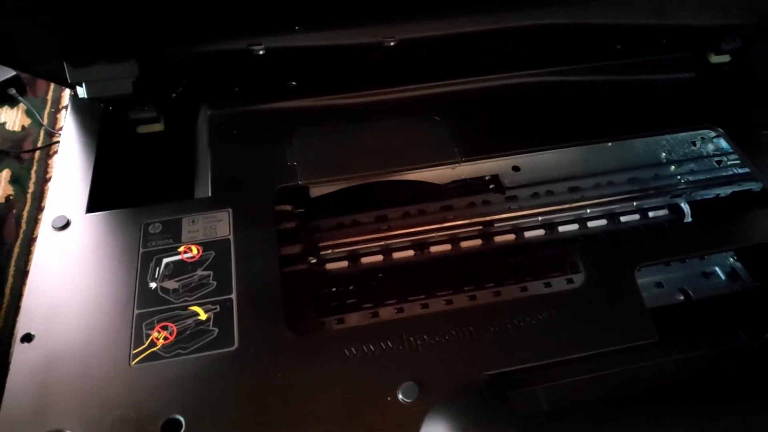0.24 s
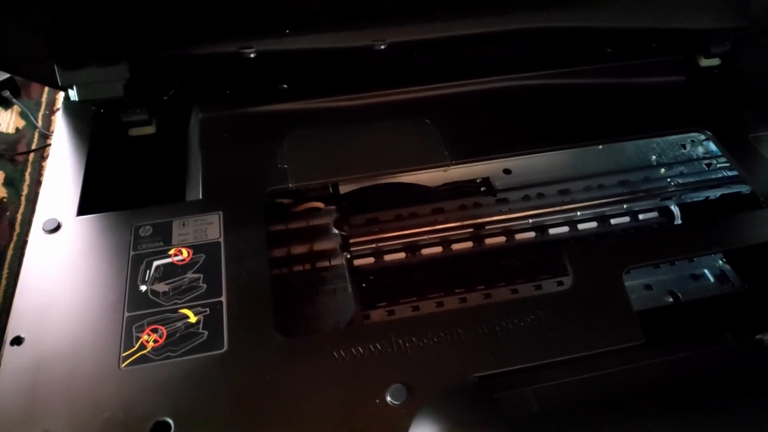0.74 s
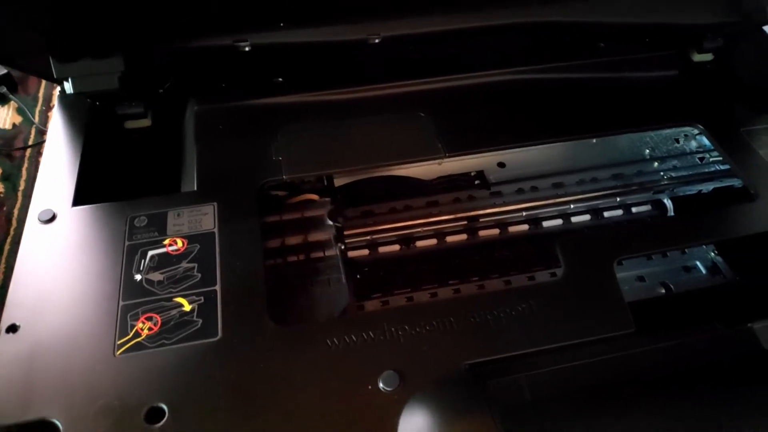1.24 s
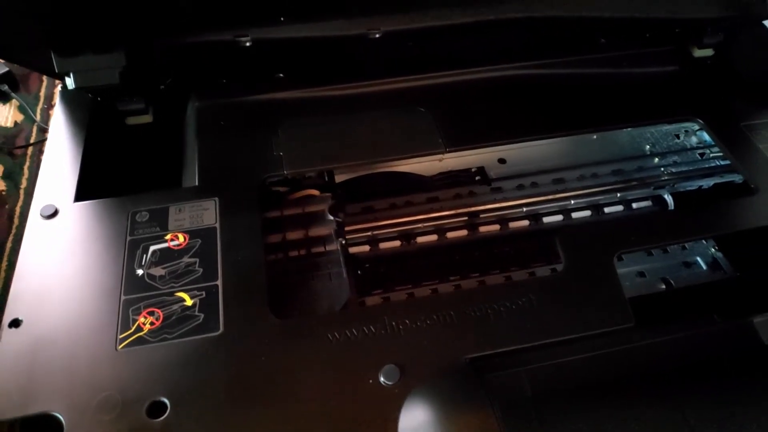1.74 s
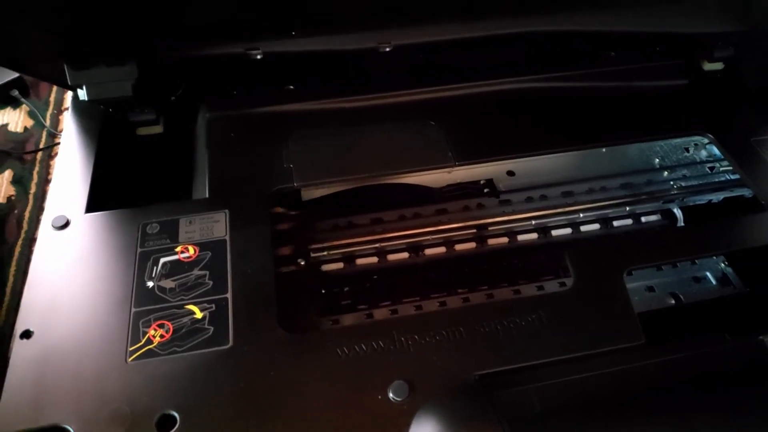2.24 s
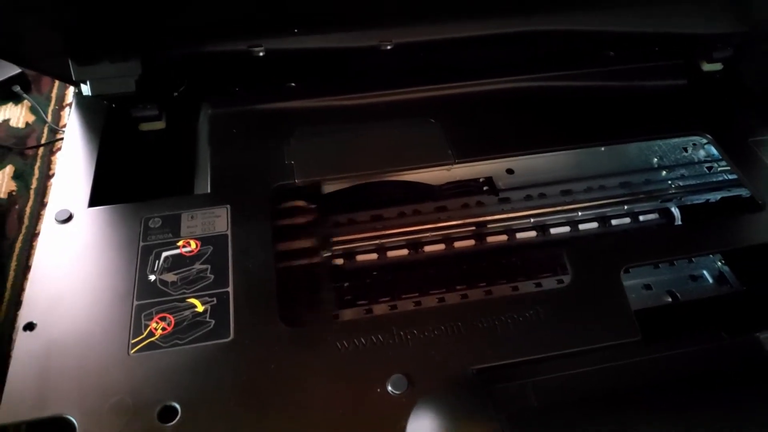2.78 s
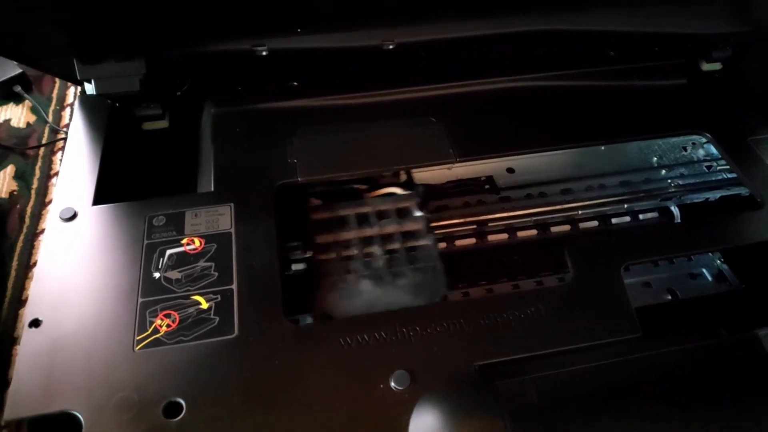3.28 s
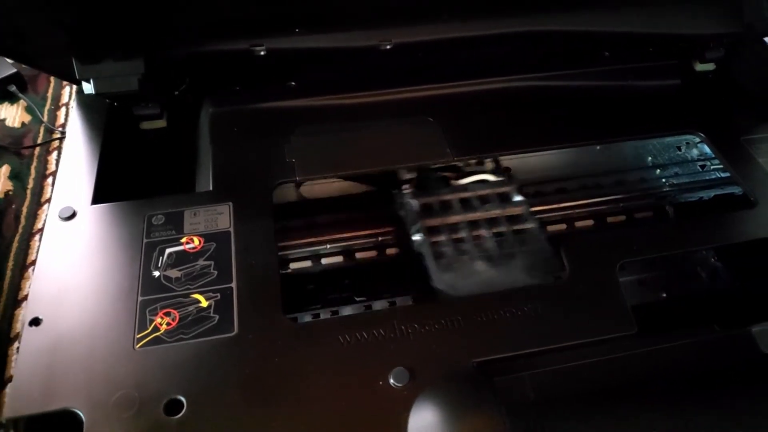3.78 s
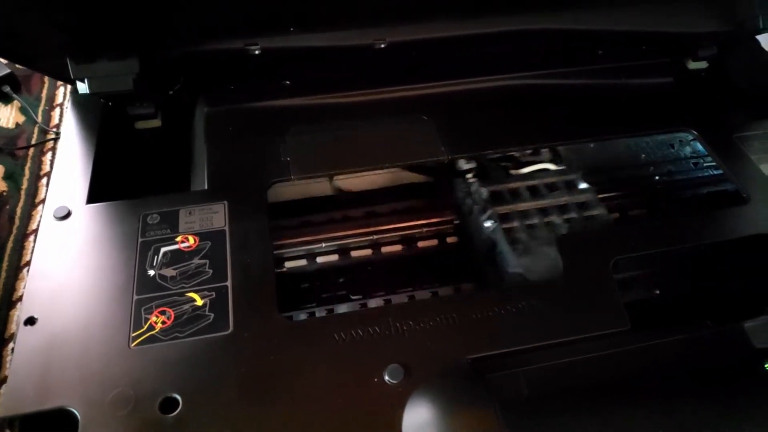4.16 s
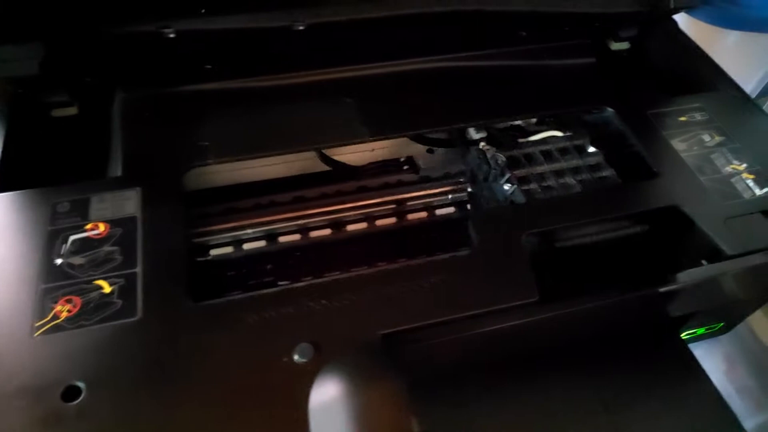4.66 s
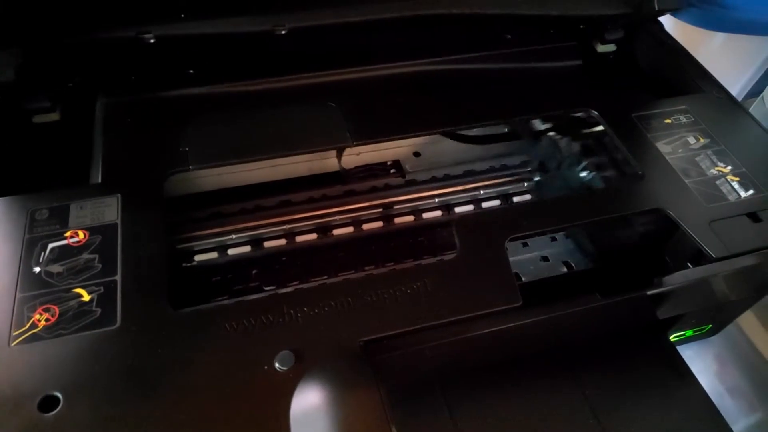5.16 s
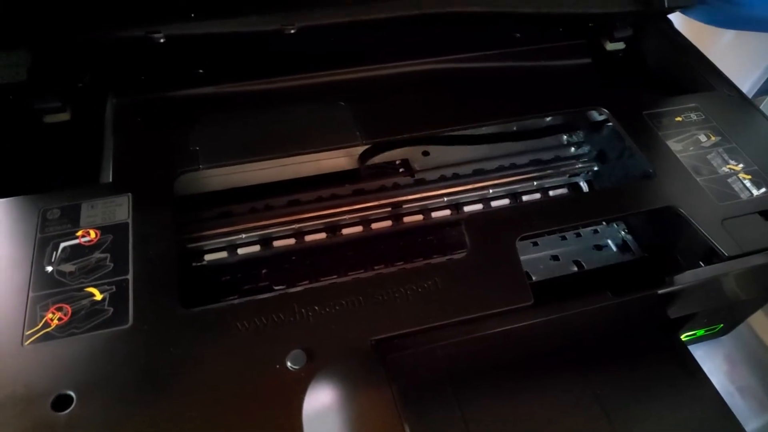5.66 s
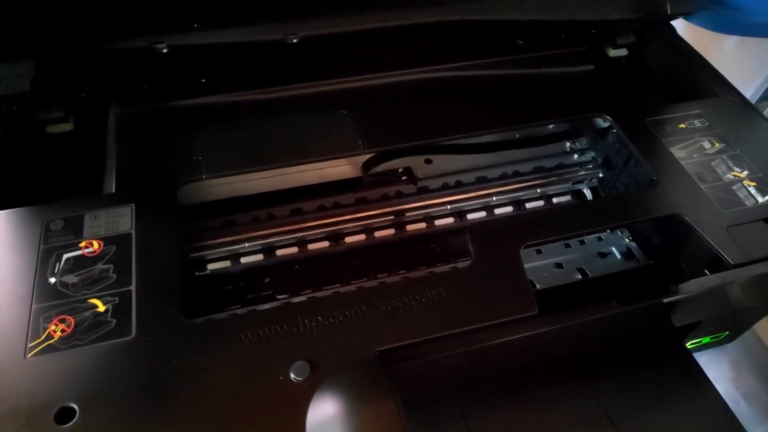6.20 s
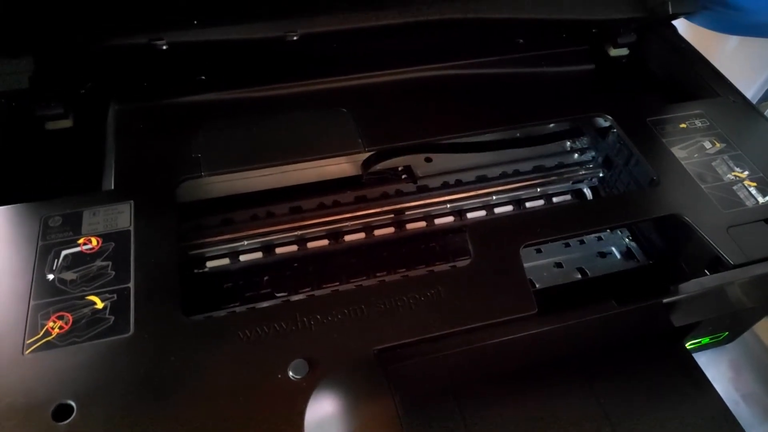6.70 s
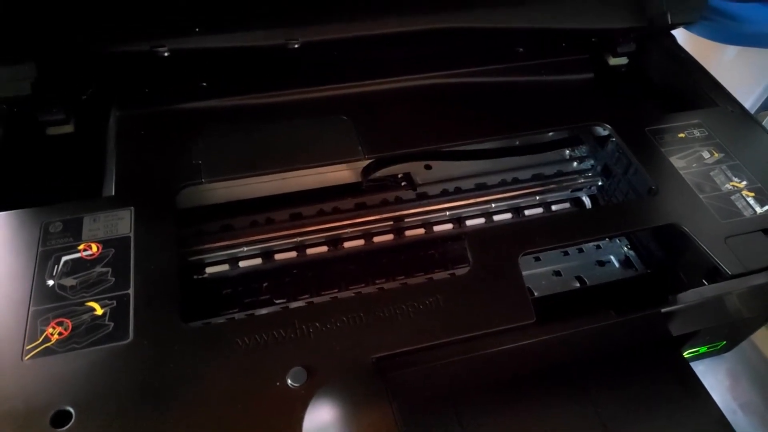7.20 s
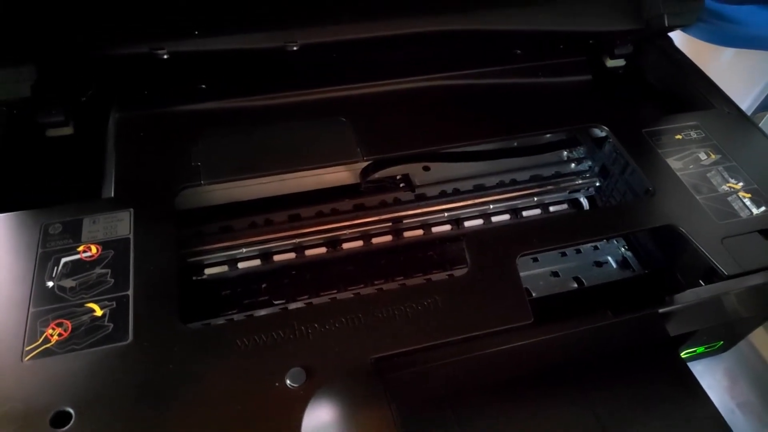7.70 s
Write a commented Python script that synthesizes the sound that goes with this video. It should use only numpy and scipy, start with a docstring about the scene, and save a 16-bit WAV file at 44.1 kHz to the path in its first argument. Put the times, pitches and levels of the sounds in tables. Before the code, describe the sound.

Close above a printer: sharp plastic clacks, a rough pulsing gear grind, a long faint carriage hiss, light clicks, and a second short grinding run.

```python
"""In a quiet room, an open inkjet printer is heard from close above. Its gear train, modelled as noise gated
by tooth impacts, grinds in short nudges and two long runs that throb with each turn of a roller.
Latches and the carriage clack as noise bursts coloured by the hollow housing; levers, frame and panels
ring as damped modes. Before and between the runs the carriage slides with a soft friction hiss, a whirr and
a faint whine. A decaying-noise echo and a low background complete the scene."""
import sys
import numpy as np
from scipy import signal
from scipy.fft import rfft, irfft, next_fast_len
from scipy.io import wavfile
from scipy.ndimage import map_coordinates

SR = 44100
rng = np.random.default_rng(int(sys.argv[2]) if len(sys.argv) > 2 else 0)


def to_wav(sig):
    """Store sig (one row per channel, or 1-D mono) as 16-bit WAV at the path in sys.argv[1].

    Samples outside -1..1 are clipped; the rate is SR.
    """
    pcm = np.clip(np.atleast_2d(sig), -1, 1) * 32767
    pcm = np.round(pcm).astype(np.int16)
    wavfile.write(sys.argv[1], SR, pcm.T)  # frames by channels


N = 350065
TIME = np.arange(N) / SR
SIZE = next_fast_len(N + SR // 2, True)
HZ = np.fft.rfftfreq(SIZE, 1 / SR)

# short steps of the gears: (start [s], length [s], relative grind level [dB], relative rasp level [dB])
NUDGES = [(0, 0.055, -51, -50.5), (0.125, 0.051, -50.5, -52), (0.238, 0.033, -55.5, -50),
          (2.304, 0.36, -56.5, -63.5), (2.565, 0.08, -51.5, -57.5), (2.693, 0.1, -59.5, -56),
          (5.455, 0.071, -60, -68), (5.6, 0.41, -63.5, -67.5), (5.539, 0.1, -51, -54.5),
          (5.768, 0.03, -53, -69), (5.994, 0.15, -64, -64.5), (6.18, 0.3, -64, -69.5),
          (6.466, 0.18, -60.5, -76), (6.534, .025, -58, -76), (6.761, 0.16, -49.5, -64),
          (6.787, 0.14, -58.5, -56), (7.419, 0.397, -55, -56), (7.556, 0.11, -48, -63),
          (7.717, 0.062, -53, -59)]
# long runs of the gears: (start [s], length [s], relative grind level [dB], relative rasp level [dB],
# roller rate [turns/s], first tight spot [s], throb depth [+-dB])
RUNS = [(0.507, 1.3125, -37, -41.5, 6.405, 0.6703, 4), (6.954, 0.461, -41, -44.5, 5.26, 7.025, 4)]
# spectra of tooth grind, tooth rasp, loose parts and loaded gear frame: (frequency [Hz], relative level [dB])
GRIND = [(40, -37), (90, -10), (140, -6), (230, -3), (320, -0.5), (700, -3), (900, -3.5), (1300, -8.5),
         (2000, -11), (3000, -16), (4500, -31), (8000, -70)]
RASP = [(1200, -30.5), (2800, 1), (4000, 1.5), (5200, 0), (6600, 4), (8200, 1), (9700, 0), (11500, 4.5),
        (13500, 3.5), (15600, -0.5), (17000, -33)]
CHATTER = [(400, -9), (750, 3.5), (1400, 1), (2200, 0.5), (3200, -14.5), (5000, -33.5)]
DRONE = [(60, -47.5), (150, -21.5), (190, 0.5), (240, -8), (285, 1.5), (340, -13), (600, -36), (1500, -70)]


def gears(body):
    """Forced vibration: tooth impacts shake the housing, sound directly and set loose parts moving."""
    nudging = sum(drive(*row) for row in NUDGES)
    running = sum(run(*row) for row in RUNS)
    uneven_db = 0.6 * wobble(70)
    grind, rasp, loose = (nudging + running) * amp(uneven_db)

    shake = teeth(mesh_hz=346.6, jitter=0.3, spread_db=3, life=0.0023, rub=0.13)
    scrape = teeth(mesh_hz=343.6, jitter=0.12, spread_db=13, life=0.01, rub=0.31)
    chatter = pings(low_hz=461, high_hz=3260, spread_db=1.5, t60=0.027, count=4000)
    rumble = nudging[0] * white()
    hum = drone() * white()

    # levels of the mechanisms relative to their drive
    grinding = grind * (amp(-5.5) * shake + amp(-7) * rattle(jitter=0.592))
    parts = [
        (grinding, GRIND),
        (amp(-1.5) * rasp * scrape, RASP),
        (amp(-12) * loose * chatter, CHATTER),
        (amp(-1) * rumble, THUD),
        (amp(-9) * rasp * ticks(life=0.0016), RASP),
        (amp(-10.5) * hum, DRONE),
    ]
    return sum(radiate(force, along(colour) + body) for force, colour in parts)


GRIND_FALL_DB_PER_S, RASP_FALL_DB_PER_S = 279, 625


def drive(start, length, grind_db, rasp_db):
    """Transient excitation: gains of the grind, the rasp and the loose parts during one move of the gears."""
    grind = amp(grind_db) * move(start, length, GRIND_FALL_DB_PER_S)
    rasp = amp(rasp_db) * move(start, length, RASP_FALL_DB_PER_S)
    return np.array([grind, rasp, rasp])


SLACK_DB, SLACK_S = 6, 0.071  # initial loss of grind, and its time constant
RASP_THROB, CHATTER_THROB = 1.0, 1.22  # throb depth over that in the grind


def run(start, length, grind_db, rasp_db, turn_hz, tight_at, throb_db):
    """Amplitude modulation: a run takes up its slack exponentially and throbs with the roller."""
    taut = amp(-SLACK_DB * np.exp(-np.maximum(TIME - start, 0) / SLACK_S))
    throb = roller(turn_hz, tight_at, throb_db)
    depths = np.array([taut * throb, throb ** RASP_THROB, throb ** CHATTER_THROB])
    return drive(start, length, grind_db, rasp_db) * depths


def roller(turn_hz, tight_at, depth_db):
    """Periodic loading: an eccentric roller loads the gears once a turn and briefly lets go."""
    load = np.abs(np.cos(np.pi * turn_hz * (TIME - tight_at)))
    return amp(depth_db * (2 * load - 1))


def teeth(mesh_hz, jitter, spread_db, life, rub):
    """Gear meshing: jittered impacts of uneven strength gate noise; rub is the steady share of its power."""
    draws = rng.uniform(-1, 1, (4000, 2))
    times = (np.arange(len(draws)) + jitter * draws[:, 0]) / mesh_hz
    inside = (times > 0) & (times < (N - 1) / SR)
    energies = amp(spread_db * draws[inside, 1]) ** 2
    blows = np.bincount((times[inside] * SR).astype(int), energies, N)
    power = decay(blows, life)
    return np.sqrt(rub + (1 - rub) * power / power.mean()) * white()


RATTLES_PER_S, RATTLE_SPREAD_DB = 105, 7


def rattle(jitter):
    """Backlash impacts: single hard knocks of the teeth, uneven in time and strength."""
    draws = rng.uniform(-1.019, 1, (2000, 3))
    times = (np.arange(len(draws)) + jitter * draws[:, 0]) / RATTLES_PER_S
    inside = (times > 0) & (times < (N - 1) / SR)
    index = (times[inside] * SR).astype(int)
    sizes = amp(RATTLE_SPREAD_DB * draws[inside, 1])
    signs = np.sign(draws[inside, 2])  # random polarity in the second force
    blows = np.array([np.bincount(index, sizes * way, N) for way in (1, signs)])
    return blows / blows.std()


def pings(low_hz, high_hz, spread_db, t60, count):
    """Modal superposition: loose plastic parts buzz as many tiny damped notes, phased apart in each force."""
    when, pitch, size, *phases = rng.random((count, 5)).T[:, :, None]
    t = np.arange(SR // 80) / SR  # each note is cut after 1/80 s
    envelope = amp(spread_db * size) * amp(-60 * t / t60)
    turns = (low_hz + (high_hz - low_hz) * pitch) * t
    index = ((when * N).astype(int) + np.arange(len(t))).ravel()
    out = []
    for phase in phases:
        notes = envelope * np.sin(2 * np.pi * (turns + phase))
        out.append(np.bincount(index, notes.ravel(), N)[:N])
    out = np.array(out)
    return out / out.std()


TICKS_PER_S, TICK_SPREAD_DB = 61, 23


def ticks(life):
    """Poisson-like impacts: tiny random contacts of uneven strength; life is their power's time constant [s]."""
    sizes = amp(TICK_SPREAD_DB * (2 * rng.random(N) - 1))
    struck = rng.random(N) < TICKS_PER_S / SR
    power = decay((sizes * struck) ** 2, life)
    return np.sqrt(power / power.mean()) * white()


DRONE_DELAY_S, DRONE_FALL_DB_PER_S = 0.122, 150  # the frame rings on after the stop


def drone():
    """Structural resonance: gain of the loaded gear frame, which drones evenly through the throbs."""
    gain = 0
    for start, length, grind_db, *_ in RUNS:
        loaded = move(start + DRONE_DELAY_S, length - DRONE_DELAY_S, DRONE_FALL_DB_PER_S)
        gain = gain + amp(grind_db) * loaded
    return gain


# plastic contacts: (time [s], relative snap level [dB], treble edge over the snap [dB],
# relative knock level [dB], pitch of the struck part [Hz], relative housing thud level [dB])
CLACKS = [(0.0373, -30.5, 6, -42.5, 690, -54), (0.114, -45.5, -3, -38.5, 560, -48),
          (.191, -41.5, -18, -41, 520, -42), (0.2663, -27.5, -11.5, -42, 1400, -49.5),
          (0.51, -43, -18, -43, 605, -52), (.5371, -25, -7, -39, 715, -57),
          (1.1463, -23.5, -7, -36.5, 1050, -46), (1.2318, -26, -4.5, -36, 1450, -57),
          (1.2775, -23.5, -3, -46, 710, -50), (1.296, -30, -9, -45, 760, -50),
          (1.3105, -26, -6, -30.5, 1421, -62), (1.3625, -30, -11, -35.5, 780, -58),
          (2.2833, -42, -8.5, -47.5, 1060, -51), (2.3438, -52, -6, -46, 629, -50),
          (2.388, -36, 1.5, -35.5, 720, -36.5), (2.397, -38, -11, -36, 820, -36),
          (2.425, -47, -14, -49, 441, -44), (2.4495, -52, -9, -55, 700, -60),
          (2.4943, -29, 4, -37.5, 686, -50), (2.577, -41.5, -6, -38.5, 554, -44),
          (2.616, -34, -8, -51, 450, -44), (2.6347, -41, -18, -43.5, 732, -47),
          (2.668, -46, -21, -47, 1410, -49), (2.7292, -31, -9, -40.5, 1076, -64),
          (2.742, -26, -12.5, -42, 800, -50), (5.5439, -52, -5, -42, 1080, -37.5),
          (5.5523, -34, -3, -33, 750, -42), (5.5809, -32.5, -1, -44, 748, -50),
          (5.6207, -41.5, 4, -46, 726, -51), (5.745, -44.5, -1.5, -49.5, 700, -35.5),
          (5.812, -56, -14, -51.5, 624, -52), (5.8735, -32.5, -10, -45, 830, -54),
          (6.023, -51, -25, -53, 600, -49.5), (6.1552, -41.5, -1.5, -37, 727, -40.5),
          (6.3252, -49, -14, -67, 721, -63), (6.384, -68, -11, -58, 800, -46.5),
          (6.6004, -59, -8, -48, 735, -48.5), (6.767, -56, -15, -44, 800, -49),
          (6.7977, -44, -1, -57, 769, -42), (6.8114, -36.5, -21, -48, 786, -64),
          (6.8397, -39, -8, -44, 770, -64), (6.8593, -39.5, -19, -42.5, 776, -42),
          (6.9674, -38.5, -1, -40, 450, -35.5), (7.2855, -34.5, -3, -41, 830, -36.5),
          (7.3766, -25.5, -2, -35.5, 1092, -45), (7.4026, -34, -11, -34.5, 542, -39),
          (7.5164, -42.5, -8, -61, 700, -47), (7.5639, -44.5, -8, -41, 442, -44),
          (7.583, -42, -1, -56, 500, -56), (7.601, -38, -2, -41.5, 667, -59),
          (7.6194, -41.5, -6, -56, 696, -60), (7.6795, -36, -4, -50, 1695, -46),
          (7.7537, -40, -4.5, -43.5, 620, -43.5)]
# spectra of the four components of a contact: (frequency [Hz], relative level [dB])
SNAP = [(900, -17.5), (2500, -1), (4000, -2), (5300, 0.5), (6700, 6.5), (8200, 0), (10000, -1),
        (13000, -31), (17000, -44)]
EDGE = [(6000, -27.5), (9500, -12), (11300, -3), (13500, -2.5), (15700, -8), (17000, -8.5)]
KNOCK = [(200, -32), (480, -0.5), (750, -0.5), (1400, -4.5), (2600, -6), (4000, -12), (8000, -46)]
THUD = [(35, -41), (85, -11.5), (150, -8.5), (230, -7), (380, -4.5), (550, -12.5), (1200, -43)]


def clacks(body):
    """Impact excitation: each contact snaps, knocks the struck part and thuds through the housing."""
    snap, edge, knock, thud = np.zeros((4, 2, N + SR))
    for s, snap_db, edge_db, knock_db, knock_hz, thud_db in CLACKS:
        first = round(s * SR)
        span = np.s_[:, first:first + SR // 2]
        snap[span] += amp(snap_db) * burst(rise=0.0014, t60=0.038, tail_db=-21, tail_t60=0.095)
        edge[span] += amp(snap_db + edge_db) * burst(rise=0.0018, t60=0.027, tail_db=-29, tail_t60=0.12)
        blow = burst(rise=0.0018, t60=0.084, tail_db=-16, tail_t60=0.16)
        knock[span] += amp(knock_db) * ring(blow, knock_hz, width_hz=54, lift_db=5.5, overtone_db=-1.5)
        thud[span] += amp(thud_db) * burst(rise=0.0013, t60=0.28, tail_db=-7, tail_t60=0.6)
    parts = [
        (amp(-3.5) * snap, SNAP),
        (amp(1.5) * edge, EDGE),
        (amp(-2.5) * knock, KNOCK),
        (amp(-8.5) * thud, THUD),
    ]
    return sum(radiate(force[:, :N], along(colour) + body) for force, colour in parts)


def burst(rise, t60, tail_db, tail_t60):
    """Double decay: a quick flurry of vibration, then the weaker ring of the parts around it."""
    t = np.arange(SR // 2) / SR
    decays = amp(-60 * t / t60) + amp(tail_db - 60 * t / tail_t60)
    shape = (1 - np.exp(-t / rise)) * decays
    return shape / shape.max() * rng.standard_normal((2, len(t)))


KNOCK_OVERTONE = 1.87  # the struck part's second mode over its first


def ring(x, hz, width_hz, lift_db, overtone_db):
    """Resonance: the struck part amplifies the blow at its own pitch and at one overtone."""
    def band(centre):
        return signal.lfilter(*signal.iirpeak(centre, centre / width_hz, SR), x)

    return x + amp(lift_db) * band(hz) + amp(overtone_db) * band(hz * KNOCK_OVERTONE)


# small levers that ping as they spring free: (time [s], frequency [Hz], level [dB])
LEVERS = [(2.159, 2440, -50.5), (2.574, 1280, -37.5), (6.155, 1440, -37.5), (6.384, 808, -39.5),
          (7.563, 1790, -30.5), (7.68, 1760, -27.5), (7.754, 1230, -38.5)]
LEVER_CYCLES = 56  # a ping falls by 60 dB in this many cycles


def levers():
    """Free vibration: each released lever pings at its natural frequency."""
    return place([(s, mode(hz, db, LEVER_CYCLES / hz)) for s, hz, db in LEVERS])


# bumps that leave the frame or a large panel booming: (time [s], frequency [Hz], level [dB], t60 [s])
BUMPS = [(0.194, 326, -33, 0.084), (.511, 343, -28, 0.071), (2.386, 108, -28.5, .16),
         (1.826, 255, -32, 0.1), (2.42, 181, -31, 0.13), (5.547, 108.5, -38, 0.14), (5.745, 122, -35, 0.18),
         (5.748, 342, -46, 0.088), (6.164, 373, -35, 0.083), (7.404, 183, -28.5, 0.29),
         (7.745, 225, -38, 0.37)]


def bumps():
    """Impulse response: heavy bumps of the mechanism each leave one low mode booming."""
    return place([(s, mode(hz, db, t60)) for s, hz, db, t60 in BUMPS])


# low modes of the housing panels: (frequency [Hz], level over the tabled thud [dB], t60 [s])
PANELS = [(191.6, -3.5, 0.21), (231.5, -0.5, 0.16), (276, 1, 0.058), (341.5, 1.5, .11)]


def panels():
    """Plate modes: every thud rings the low panel modes, each at a slightly random level."""
    notes = []
    for s, *_, thud_db in CLACKS:
        for hz, db, t60 in PANELS:
            notes.append((s, mode(hz, thud_db + db + rng.normal(0, 2), t60)))
    return place(notes)


def mode(hz, db, t60):
    """Damped oscillation: one decaying mode, its phase slightly unsteady."""
    t = np.arange(SR // 2) / SR
    drift = 0.51 * np.cumsum(rng.standard_normal(len(t))) / np.sqrt(t60 * SR)
    onset = 1 - np.exp(-t * hz / 2)
    return amp(db - 60 * t / t60) * onset * np.sin(2 * np.pi * (hz * t + drift))


def place(notes):
    """Linear superposition: notes add up from their starting times, alike in both channels."""
    out = np.zeros(N + SR)
    for s, note in notes:
        out[round(s * SR):][:len(note)] += note
    return out[:N]


# slides of the carriage on its rail: (start [s], length [s], relative level [dB])
SLIDES = [(.28, .2, -61.5), (1.85, .5, -65.5), (2.4, .56, -62.5), (3.005, 2.42, -60.5)]
SLIDE_FALL_DB_PER_S = 218


def sliding():
    """Sliding contact: gain of the carriage's successive moves."""
    return sum(amp(db) * move(start, length, SLIDE_FALL_DB_PER_S) for start, length, db in SLIDES)


# spectrum of the rail's hiss: (frequency [Hz], relative level [dB])
RAIL = [(150, -20), (500, -4.5), (1200, -3), (2500, -3.5), (4000, -5), (5600, -4), (7300, 1.5), (9500, -4),
        (12200, 6), (14000, 1), (15700, -3), (17000, -20)]


def rail_hiss():
    """Dry friction: the sliding carriage gives broadband noise of slightly uneven level."""
    uneven_db = 0.7 * wobble(21)
    friction = sliding() * amp(uneven_db) * white()
    return amp(-1.3) * radiate(friction, along(RAIL))


# spectrum of the carriage's bearings: (frequency [Hz], relative level [dB])
RUBBING = [(150, -20), (400, -2.5), (900, -0.5), (1400, -4), (2200, -10), (4000, -25)]
RUBBING_DB, RUBBING_SWING_DB = -13.5, 3.5  # level over the tabled slide; swing of its random curve


def bearing_rubbing():
    """Irregular friction: the bearings catch and ease, so the noise comes in patches."""
    catching_db = RUBBING_SWING_DB * (wobble(8.6) + wobble(25.95)) / np.sqrt(2)
    rubbing = sliding() * amp(RUBBING_DB + catching_db) * white()
    return radiate(rubbing, along(RUBBING))


# resonances of the belt and pulleys: (frequency [Hz], mean level during the last slide [dB])
WHIRR = [(205, -76.5), (556, -78), (722, -82.5), (975, -80), (1325, -81.5)]
WHIRR_SWING_DB = 4


def whirr():
    """Narrow-band resonance: lines of the belt drive swell and fade independently as the carriage travels."""
    travel = sliding() / amp(SLIDES[-1][2])
    lines = 0
    for hz, db in WHIRR:
        level = amp(db + WHIRR_SWING_DB * wobble(3.96))
        lines = lines + level * fuzzy(hz * TIME, blur=30)
    return travel * lines


# carriage drive's whine, sinking as it slows near the end of the rail:
# (time [s], frequency before the ratio [Hz], level before the partial's gain [dB])
WHINE = [(4.86, 2990, -88), (4.97, 2960, -76), (5.09, 2990, -87), (5.16, 2700, -77), (5.36, 2710, -82),
         (5.44, 2640, -72), (5.55, 2680, -77)]
# lines of the whine: (frequency ratio, gain [dB])
WHINE_PARTIALS = [(.866, -2), (1, 2)]


def whine():
    """Frequency modulation: the carriage drive sings faintly in fuzzy lines of gliding pitch."""
    s, hz, db = np.transpose(WHINE)
    level = amp(np.interp(TIME, s, db, left=-120, right=-120))
    turns = np.cumsum(np.interp(TIME, s, hz)) / SR
    return level * sum(amp(part_db) * fuzzy(ratio * turns, blur=110) for ratio, part_db in WHINE_PARTIALS)


def fuzzy(turns, blur):
    """Random modulation: a tone whose strength and phase wander, blur knots a second."""
    envelope = wobble(blur) + 1j * wobble(blur)
    return np.real(envelope * np.exp(2j * np.pi * turns)) / np.sqrt(2)


# decay of the room: (frequency [Hz], t60 [s])
WALLS = [(150, 0.78), (700, 0.094), (2000, 0.48), (5000, 0.27), (13000, 0.18)]


def echo(x):
    """Reverberation: a noise tail with frequency-dependent decay, longest and most alike in the bass."""
    hz, t, z = signal.stft(rng.standard_normal((2, SR // 2)), SR, nperseg=256)
    alike = np.clip(along(ALIKE, hz), -1, 1)[:, None]
    mid, side = z[0] * np.sqrt(1 + alike), z[1] * np.sqrt(1 - alike)
    fade = amp(-60 * t / along(WALLS, hz)[:, None])
    tail = signal.istft(np.array([mid + side, mid - side]) * fade, SR, nperseg=256)[1]
    return signal.fftconvolve(x, tail / np.linalg.norm(tail[0]), axes=1)[:, :N]


# spectrum of the background: (frequency [Hz], relative level [dB])
ROOM = [(20, -11), (31, 5.5), (42, -1), (75, 0.5), (105, -11.5), (130, -8), (165, -3.5), (205, 0.5),
        (270, -11.5), (400, -15), (1000, -18.5), (4000, -29), (12500, -27), (16000, -30)]


def room_tone():
    """Stationary noise: a low, faintly wavering background."""
    waver_db = 0.5 * wobble(21)
    return amp(-60 + waver_db) * radiate(white(), along(ROOM))


START_S = 0.0053  # the motor comes up to speed


def move(start, length, fall_db_per_s):
    """Attack and decay: gain of one motor move that rises, holds and dies away exponentially."""
    attack = np.clip((TIME - start) / START_S, 0, 1)
    return attack * amp(-fall_db_per_s * np.maximum(TIME - start - length, 0))


# resonances of the housing and the steel chassis: (frequency [Hz], width [Hz], lift [dB])
HOUSING = [(99.7, 8.7, 14), (188.3, 24.4, 13.5), (242, 9.5, -6), (271.7, 79, 9), (366, 23, 2),
           (438, 96, 5.5), (557, 25, 6), (623, 57, 4.5), (719, 72, 6), (811, 41, 7), (981, 28, 7),
           (1082, 120, 7), (1130, 40, 2.5), (1303, 18, 3), (1438, 210, 6), (1607, 35, 5), (1798, 75, 4),
           (1980, 79, 5.5), (2224, 63, 2.5), (2576, 65, 6)]
CHASSIS = [(6360, 130, 3.5), (7242, 40, 3), (7510, 55, 6), (7922, 60, 3.5), (8260, 250, 3), (8735, 50, 2.5),
           (11130, 100, 2.5)]


def housing():
    """Modal response: lift [dB] by named resonances and a random ripple for countless small treble modes."""
    named = sum(db / (1 + (2 * (HZ - hz) / width) ** 2) for hz, width, db in HOUSING + CHASSIS)
    small = map_coordinates(rng.standard_normal(2000), [HZ / 65], mode="wrap")
    ripple_db = along([(1500, 0.076), (4000, 0.84)])
    return named + ripple_db * small


# left-right likeness: (frequency [Hz], correlation)
ALIKE = [(60, 0.84), (130, 1), (290, 0.93), (640, 0.76), (1410, 0), (3100, 0)]
# balance of the two ports: (frequency [Hz], left over right [dB])
PORTS = [(100, 1.5), (400, 0.5), (1200, -2), (2600, -3), (4100, 4), (5300, 0), (6600, -9.5), (7800, -3.5),
         (9200, 1.5), (10800, 11), (12500, 14.5), (15500, 21.5)]


def radiate(force, colour_db):
    """Minimum-phase radiation: two forces take a causal colour and reach two ports, alike only in the bass."""
    gain = amp(colour_db)
    level_gain = gain / np.sqrt(np.mean(gain ** 2))
    cepstrum = irfft(np.log(level_gain + 1e-6), SIZE)
    # folding the cepstrum onto positive time makes the filter causal
    response = np.exp(rfft(2 * cepstrum[:SIZE // 2], SIZE) - cepstrum[0])
    a, b = rfft(force, SIZE) * response
    turn = np.arccos(np.clip(along(ALIKE), -1, 1)) / 2
    mid, side = a * np.cos(turn), b * np.sin(turn)
    lean = amp(along(PORTS))
    ports = np.array([(mid + side) * lean, mid - side]) * np.sqrt(2 / (1 + lean ** 2))
    return irfft(ports, SIZE)[:, :N]


def amp(db):
    """Logarithmic level: decibels to gain."""
    return 10 ** (np.asarray(db) / 20)


def along(points, hz=HZ):
    """Logarithmic frequency: (frequency [Hz], value) points interpolated on a log axis."""
    f, v = np.transpose(points)
    return np.interp(np.log(hz + 1), np.log(f + 1), v)


def white():
    """White noise: two independent forces of flat spectrum."""
    return rng.standard_normal((2, N))


def wobble(rate):
    """Slow random fluctuation: a smooth curve with rate knots a second."""
    return map_coordinates(rng.standard_normal(int(N * rate / SR) + 4), [TIME * rate])


def decay(blows, life):
    """Exponential decay: the power of each blow dies with time constant life [s]."""
    return signal.lfilter([1], [1, -np.exp(-1 / (life * SR))], blows)


def scene():
    """Superposition: the printer, its echo and the room."""
    body = housing()
    printer = gears(body) + clacks(body) + levers() + bumps() + panels()
    # hiss, rubbing and whirr move with the same slides; the whine follows its own curve
    printer = printer + rail_hiss() + bearing_rubbing() + whirr() + whine()
    return printer + amp(-14.5) * echo(printer) + room_tone()


TOP_HZ = 15900


def record(dry):
    """Band limitation: a steep low-pass removes the sound above the recorder's limit."""
    return irfft(rfft(dry, SIZE) / (1 + (HZ / TOP_HZ) ** 120), SIZE)[:, :N]


dry = scene()
out = record(dry)
to_wav(out)
```